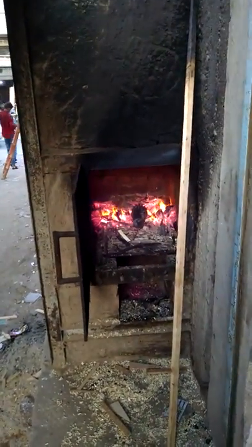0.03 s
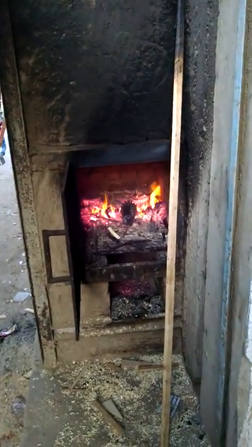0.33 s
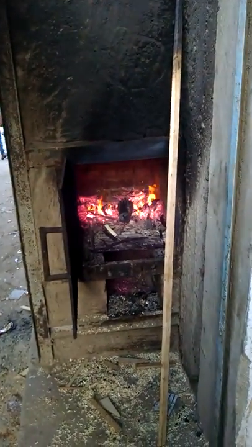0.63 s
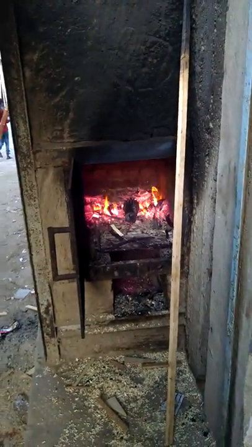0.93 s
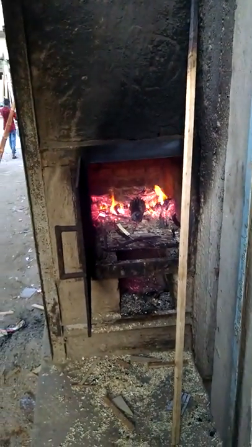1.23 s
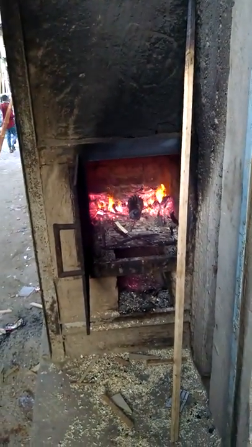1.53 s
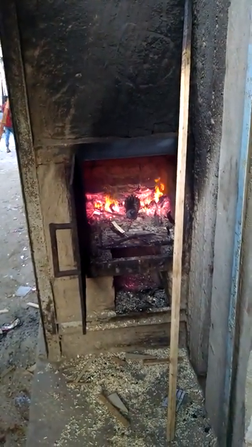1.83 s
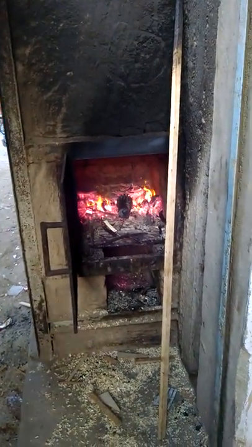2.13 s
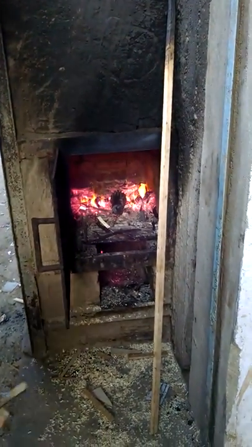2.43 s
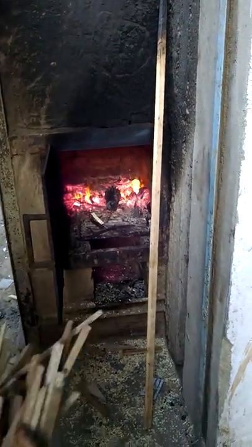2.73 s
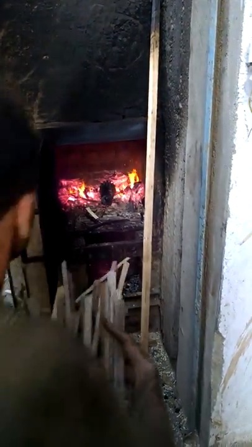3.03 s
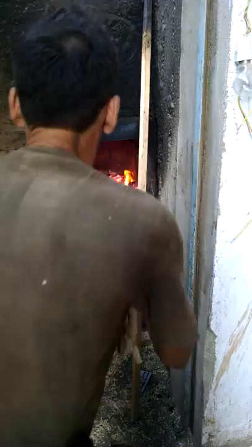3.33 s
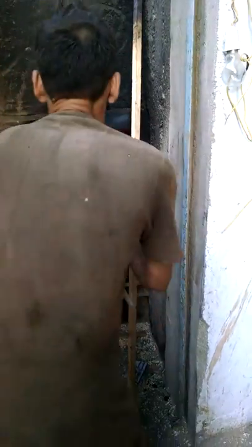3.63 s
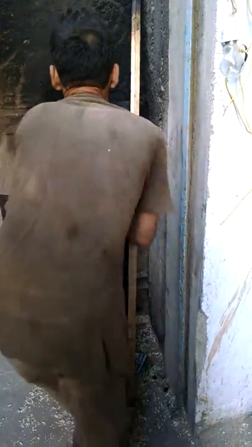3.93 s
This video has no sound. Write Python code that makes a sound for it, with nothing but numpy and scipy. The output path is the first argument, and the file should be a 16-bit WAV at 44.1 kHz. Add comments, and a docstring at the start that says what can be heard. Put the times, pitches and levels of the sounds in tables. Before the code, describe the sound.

Steady roar and hiss of air through a furnace, with wood bumping now and then.

```python
"""From the start, air rushes through a wood-fired workshop furnace with a steady roar and a bright hiss; an
engine throbs, slowly picking up speed, and machinery rings faintly. A distant two-tone vehicle horn sounds its
harmonics until, at 0.76 s, a sharp knock excites the resonances of a plank. Just after 2 s a dull swell briefly
fills the low middle; at 3 s a bundle of sticks bumps down by the fire door with hollow notes. Two closely
spaced microphone ports hear it all, the right one slightly earlier."""
import sys
import numpy as np
from scipy import signal
from scipy.fft import rfft, irfft, next_fast_len
from scipy.io import wavfile
from scipy.ndimage import uniform_filter1d, map_coordinates

SR = 44100
rng = np.random.default_rng(int(sys.argv[2]) if len(sys.argv) > 2 else 0)


def wrap_up_sound(samples):
    """Save the sound to the file named by the first command line argument, as 16-bit audio."""
    columns = np.atleast_2d(samples).T
    # keep every value between -1 and 1, then stretch to whole-number steps
    tamed = np.clip(columns, -1, 1)
    steps = np.round(tamed * 32767).astype(np.int16)
    wavfile.write(sys.argv[1], SR, steps)


N = 176400

# Noise spectra of the draught's roar and of the sharp-edged hiss: frequency_hz, density_db
ROAR_SPECTRUM = [(15, -13), (30, -9), (65, 2.5), (140, -1), (210, -4), (330, -2.5), (600, -1), (900, -4),
                 (1400, -5), (1700, -7.5), (2000, -5.5), (2250, -0.5), (2480, -22.5), (2750, 1.5),
                 (3100, -5.5), (3600, -6.5), (5000, -11.5), (9000, -27)]
HISS_SPECTRUM = [(3500, -38), (3680, -47), (3745, 4.5), (3800, 4), (4050, -2), (4400, -4), (5200, -6),
                 (6300, -8), (7300, -9), (8400, -10), (9300, -15), (9950, -16.5), (10250, -7.5),
                 (10600, -11.5), (11700, -9), (12700, -11.5), (13500, -9), (15300, -16)]
# Slow envelope of the roar, and surges of the hiss about their mean: time_s, level_db
ROAR_ENVELOPE = [(0, -0.5), (.75, 1.3), (1, 0.7), (2.05, 0.8), (2.14, 1.3), (2.5, .4), (2.58, 0.3), (3, 0),
                 (3.4, -0.2), (4, -0.5)]
HISS_SURGES = [(0, -31.5), (.09, -24), (.2, -31), (.3, -26), (.45, -31), (.56, -28.5), (.63, -28.5),
               (.76, -30), (.82, -35), (.93, -32), (1.02, -31.5), (1.13, -28.5), (1.33, -25), (1.39, -34),
               (1.55, -23.5), (1.65, -29.5), (1.72, -28), (1.95, -25), (1.99, -34.5), (2.12, -26),
               (2.51, -24), (2.54, -31), (2.73, -28.5), (3.08, -30), (3.2, -35), (3.33, -27), (3.6, -25.5),
               (3.68, -29.5), (3.8, -26), (3.92, -27), (4, -27)]
# Firing rate of the engine: time_s, rate_hz
FIRING_RATE = [(0, 89.5), (.7, 88), (1.2, 87.5), (1.9, 91.5), (2.6, 92.5), (3.3, 95.5), (4, 95.5)]
# Envelope of its throb: time_s, level_db
THROB_ENVELOPE = [(0, -29.5), (.45, -37), (.57, -27.5), (.7, -34), (1.2, -32), (1.42, -38), (1.65, -31),
                  (2.1, -33), (2.4, -28.5), (2.58, -31.5), (2.9, -31.5), (3.1, -31.5), (3.5, -30),
                  (3.65, -28.5), (4, -29.5)]
# Orders of the throb: firing_rate_multiple, level_db
THROB_ORDERS = [(.5, -13.5), (1, 1), (1.5, -7.5), (2, -7.5), (2.5, -18.5)]
# Rumble of the exhaust: frequency_hz, density_db
EXHAUST_SPECTRUM = [(25, 1), (70, -3), (110, -4.5), (190, 0.5), (290, 4), (380, -2.5), (700, -39)]
# Ringing of running machinery: pitch_hz, level_db
MACHINE_TONES = [(915, -42), (1033, -53), (1091, -42), (1195, -43), (1324, -50), (1992, -43.5), (3461, -47),
                 (3749, -34.5)]
# Harmonics of the two horns: harmonic_number, level_db
HIGH_HORN_HARMONICS = [(1, -52), (2, -35), (3, -34.5), (4, -38), (5, -39), (6, -38), (7, -43)]
LOW_HORN_HARMONICS = [(1, -49), (8, -31.5), (9, -38), (10, -33.5)]
# Their envelopes: time_s, level_db
HIGH_HORN_ENVELOPE = [(0, -4), (.15, 1.5), (.23, 3), (.34, -1.5), (.43, 3), (.7, 1)]
LOW_HORN_ENVELOPE = [(0, -3), (.17, -3), (.24, -1), (.34, 2), (.46, -13), (.54, 10), (.63, -3), (.72, 0)]
# Impacts that make up the knock: start_s, level_db
KNOCK_IMPACTS = [(.758, -17), (.770, -15), (.776, -11.5), (.797, -22)]
# Resonances of the plank: centre_hz, bandwidth_hz, level_db
PLANK_RESONANCES = [(392, 150, 0.5), (620, 100, 1), (880, 93, 0.5), (1230, 110, 4.5), (1550, 190, 6),
                    (2140, 420, 2), (3430, 1200, -1)]
# Dull swell in the low middle: frequency_hz, density_db
SWELL_SPECTRUM = [(60, -7), (160, 0.5), (320, -3), (480, -7), (660, 2), (900, -32), (2000, -24)]
# Impacts of the sticks: start_s, level_db, pitch_hz
STICK_IMPACTS = [(3.044, -15, 460), (3.054, -14, 520), (3.079, -14.5, 500), (3.098, -14, 349),
                 (3.12, -15, 390)]
# Modes of a stick's hollow note: pitch_multiple, level_db, t60_s
NOTE_MODES = [(1, -1.5, 0.067), (1.5, -10, 0.058)]
# Resonances of the sticks' clatter: centre_hz, bandwidth_hz, level_db
CLATTER_RESONANCES = [(337, 88, -4.5), (490, 67, -0.5), (710, 135, -6), (920, 77, -6), (1060, 160, -10.5),
                      (1450, 130, -13), (1670, 120, -13.5), (2720, 750, -11.5)]
# Likeness of the noise at the two ports: frequency_hz, correlation
PORT_CORRELATION = [(40, 1), (160, 0.86), (380, 0.42), (700, 0.74), (1000, 0.9), (1450, 0.97), (1800, 0.18),
                    (2100, 0.75), (2280, 0.94), (2700, 0.97), (2880, 0.95), (3200, 0.03), (3650, 1),
                    (3760, 0.75), (3950, 0.7), (4250, 1), (4400, 0.75), (4800, 0.74), (6500, 0.6),
                    (9200, 0.59), (9600, 0.8), (10400, 0.49), (11000, 0.86), (11700, 1), (12200, 0.5),
                    (12900, 0.9), (13400, .63), (14000, .85), (14600, 0.4), (15200, 0.6)]
# Phase at the ports, left minus right: frequency_hz, phase_rad
PORT_PHASE = [(40, .7), (330, .9), (460, .4), (1000, .1), (1550, -.1), (1880, -1.2), (2100, -2.8),
              (2330, -3.12), (2680, -3.17), (2850, -3.6), (3200, -5), (3650, -6.25), (4200, -6.9),
              (4550, -8.6), (5350, -9.8), (6500, -12.8), (7600, -15.5), (8200, -16.6), (9000, -18.8),
              (9600, -19.6), (9900, -21.7), (10500, -22.3), (11600, -25.2), (12700, -28.2), (13100, -28.9),
              (13900, -31.3), (15100, -34.5)]
# Level at the ports, left minus right: frequency_hz, level_db
PORT_BALANCE = [(40, -14), (90, -9.5), (140, -3), (300, -1.5), (450, 1), (1000, 0.1), (2700, -1.4),
                (4000, -2.5), (6500, -2.5), (9500, -0.2), (14000, -0.5)]

TIME_S = np.arange(N) / SR


def amp(db):
    """Amplitude ratio: tenfold for every 20 dB."""
    return 10 ** (np.asarray(db) / 20)


def unit(x):
    """Normalisation to rms 1."""
    return x / np.sqrt(np.mean(x ** 2) + 1e-20)


def along(points, hz):
    """Interpolation of (frequency_hz, value) points on a logarithmic axis."""
    knots_hz, values = np.transpose(points)
    return np.interp(np.log(hz + 1), np.log(np.sort(knots_hz) + 1), values)


def curve(rows):
    """Linear interpolation of (time_s, value) points at every sample."""
    return np.interp(TIME_S, *np.transpose(rows))


def wobble(rate_hz):
    """Smooth random modulation: a spline through rate_hz knots a second."""
    return map_coordinates(rng.standard_normal(2048), [TIME_S * rate_hz], mode="wrap")


def filtered(x, response):
    """Linear filtering: the spectrum of x times a complex frequency response."""
    size = next_fast_len(N + SR // 2)
    return irfft(rfft(x, size) * response(np.fft.rfftfreq(size, 1 / SR)), size)[..., :N]


def spread(pair):
    """Partial coherence: the sum and difference of two independent noises give left and right."""
    def weights(hz):
        angle = np.arccos(np.clip(along(PORT_CORRELATION, hz), -1, 1)) / 2
        return np.array([np.cos(angle), np.sin(angle)])
    mid, side = filtered(pair, weights)
    return np.array([mid + side, mid - side])


def rush(spectrum, patchy_db):
    """Turbulent stereo noise of rms 1, its gain varying in random patches of time and frequency."""
    cells = signal.stft(rng.standard_normal((2, N)), nperseg=512)[2]
    patches = uniform_filter1d(rng.standard_normal(cells.shape[1:]), size=10, axis=0)
    patches = uniform_filter1d(patches, size=9, axis=1)
    pair = signal.istft(cells * amp(patchy_db * unit(patches)), nperseg=512)[1][:, :N]
    return unit(filtered(spread(pair), lambda hz: amp(along(spectrum, hz))))


def tone(hz, drift_hz, flutter_db, rate_hz):
    """A sine of rms 1 under random frequency and amplitude modulation."""
    phase = 2 * np.pi * (np.cumsum(hz + drift_hz * wobble(rate_hz)) / SR + rng.random())
    return unit(np.sin(phase) * amp(flutter_db * wobble(rate_hz)))


def hiss_surge_db():
    """Modulation common to hiss and roar: the level's departure from its mean."""
    level_db = curve(HISS_SURGES)
    return level_db - level_db.mean()


def roar():
    """Turbulence in the air drawn through the fire radiates deep noise, surging a little with the hiss."""
    level_db = -22.5 + curve(ROAR_ENVELOPE) + 0.33 * hiss_surge_db() + 0.34 * wobble(22.1)
    return amp(level_db) * rush(ROAR_SPECTRUM, patchy_db=1.48)


def hiss():
    """Amplitude-modulated turbulent noise: the lower edge of the band surges more than the top."""
    crossover_hz = 5800
    surge_db = hiss_surge_db() + 0.54 * wobble(55)
    air = rush(HISS_SPECTRUM, patchy_db=1.0)
    edge = filtered(air, lambda hz: 1 / (1 + (hz / crossover_hz) ** 6))
    top = air - edge
    level_db = -19.5 + 0.42 * wobble(220)
    return amp(level_db) * (edge * amp(0.56 * surge_db) + top * amp(0.29 * surge_db))


def engine():
    """Periodic firing gives tones at orders of its rate and pulses the slowly growing exhaust noise."""
    firing_hz = curve(FIRING_RATE)
    throb = sum(amp(db) * tone(order * firing_hz, drift_hz=2.83, flutter_db=2.5, rate_hz=20)
                for order, db in THROB_ORDERS)
    puffs = 1 + 0.17 * np.sin(2 * np.pi * np.cumsum(firing_hz) / SR)
    exhaust = unit(puffs * rush(EXHAUST_SPECTRUM, patchy_db=2))
    exhaust_db = -32 + 0.5 * TIME_S
    return amp(curve(THROB_ENVELOPE)) * throb + amp(exhaust_db) * exhaust


def machinery():
    """Sustained vibration of running machines radiates faint, wavering tones."""
    return sum(amp(db) * tone(hz, drift_hz=3.73, flutter_db=1.0, rate_hz=18) for hz, db in MACHINE_TONES)


def horn(pitch_hz, harmonics, envelope):
    """A distant horn's periodic vibration gives harmonics that flutter on the way and fade on release."""
    held_until_s, release_s = 0.74, 0.079
    gate = np.clip((held_until_s - TIME_S) / release_s + 1, 0, 1)
    blare = sum(amp(db) * tone(k * pitch_hz, drift_hz=0.91, flutter_db=3.0, rate_hz=23.4)
                for k, db in harmonics)
    return gate * amp(curve(envelope)) * blare


def struck_wood(impacts, resonances, contact_t60_s, room_t60_s, room_db):
    """Impact excitation: decaying contact noise and its room tail, coloured by the wood's resonances."""
    power = np.zeros(N)
    for start_s, db in impacts:
        age_s = np.maximum(TIME_S - start_s, 0)
        contact = amp(-60 * age_s / contact_t60_s)
        tail = amp(room_db - 60 * age_s / room_t60_s)
        power += (TIME_S >= start_s) * amp(db) ** 2 * (contact ** 2 + tail ** 2)

    def body(hz):  # damped resonators of alternating polarity
        return sum((-1) ** k * amp(db) * 1j * hz * width / (centre ** 2 - hz ** 2 + 1j * hz * width)
                   for k, (centre, width, db) in enumerate(resonances))
    grit = spread(rng.standard_normal((2, N)))
    return filtered(grit * np.sqrt(power), body) / filtered(grit, body).std()


def low_swell():
    """Independent noises add in power: for half a second a dull swell fills the low middle."""
    start_s, end_s, fade_s = 2.08, 2.55, 0.022
    gate = np.clip(np.minimum(TIME_S - start_s, end_s - TIME_S) / fade_s, 0, 1)
    return amp(-29.5) * gate * rush(SWELL_SPECTRUM, patchy_db=-1.5)


def sticks():
    """Damped free vibration: each stick's end lands and rings with a hollow note over a clatter."""
    attack_s, clatter_db = 0.0017, -3
    notes = np.zeros(N)
    for start_s, db, pitch_hz in STICK_IMPACTS:
        age_s = np.maximum(TIME_S - start_s, 0)
        ring = sum(amp(mode_db - 60 * age_s / t60_s) * np.sin(2 * np.pi * multiple * pitch_hz * age_s)
                   for multiple, mode_db, t60_s in NOTE_MODES)
        notes += amp(db) * (1 - np.exp(-age_s / attack_s)) * ring
    impacts = [row[:2] for row in STICK_IMPACTS]
    clatter = struck_wood(impacts, CLATTER_RESONANCES, contact_t60_s=0.035, room_t60_s=0.23, room_db=-2.5)
    return notes + amp(clatter_db) * clatter


def ports(hz):
    """Two spaced receivers differ in phase and level; their mean power gain is 1."""
    sides = np.array([[0.5], [-0.5]])  # left, right
    gain = amp(sides * along(PORT_BALANCE, hz))
    gain /= np.sqrt(np.mean(gain ** 2, axis=0))
    return gain * np.exp(1j * sides * along(PORT_PHASE, hz))


def scene():
    """Superposition: the pressures of all sources add and reach the two ports."""
    sound = roar() + hiss() + engine() + machinery()
    sound += horn(pitch_hz=485.8, harmonics=HIGH_HORN_HARMONICS, envelope=HIGH_HORN_ENVELOPE)
    sound += horn(pitch_hz=392.3, harmonics=LOW_HORN_HARMONICS, envelope=LOW_HORN_ENVELOPE)
    knock = struck_wood(KNOCK_IMPACTS, PLANK_RESONANCES, contact_t60_s=0.07, room_t60_s=0.34, room_db=-6.5)
    return filtered(sound + knock + low_swell() + sticks(), ports)


def record(dry):
    """Band limiting: an ideal low-pass filter removes everything above 15.5 kHz."""
    return filtered(dry, lambda hz: hz < 15500)


dry = scene()
out = record(dry)
wrap_up_sound(out)
```